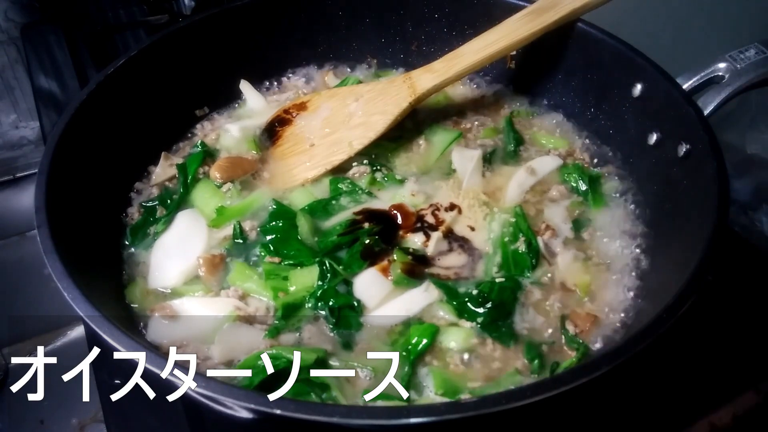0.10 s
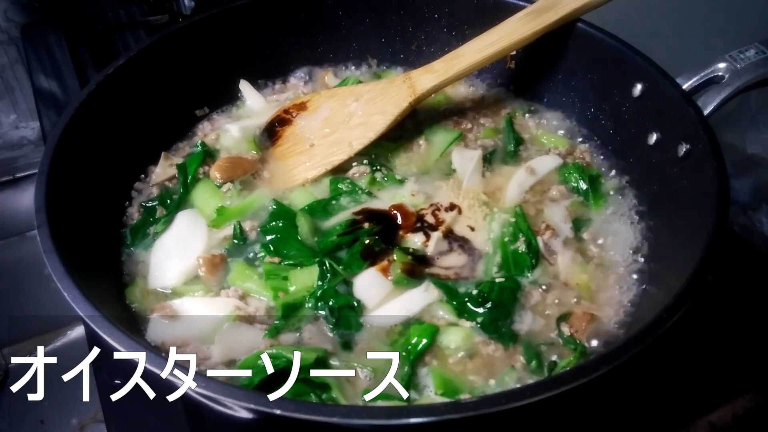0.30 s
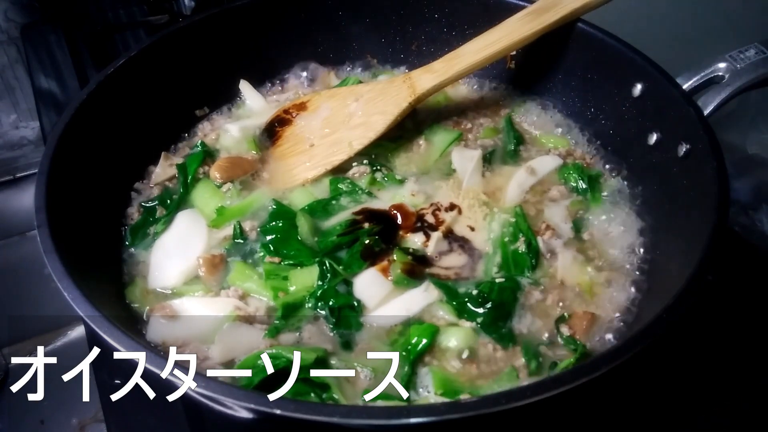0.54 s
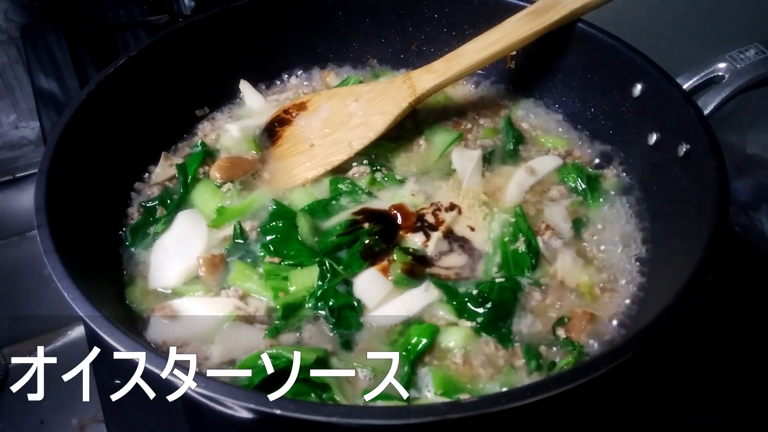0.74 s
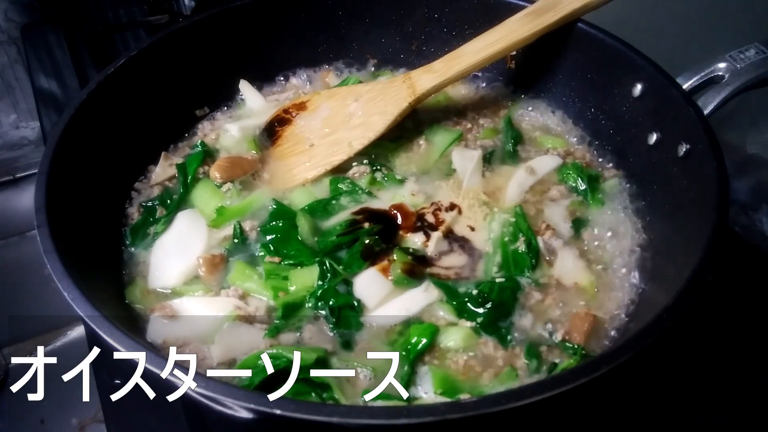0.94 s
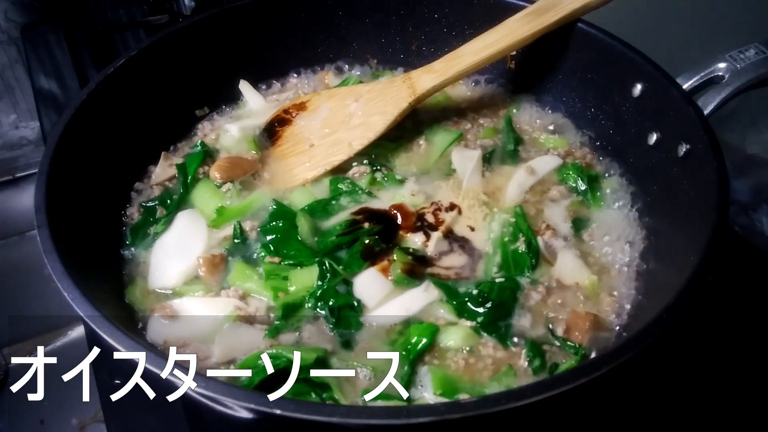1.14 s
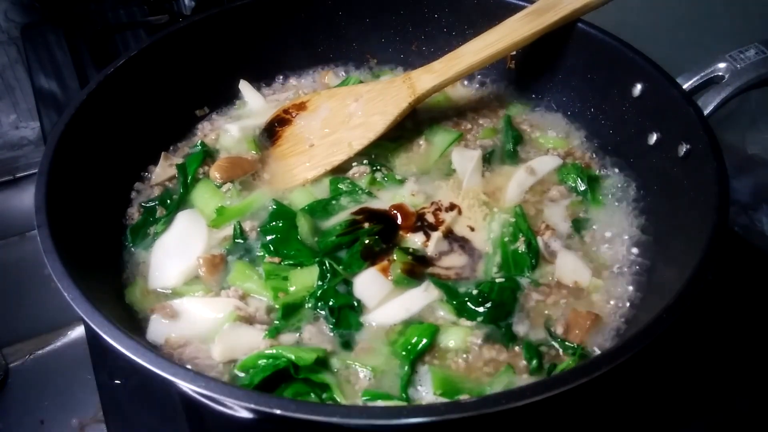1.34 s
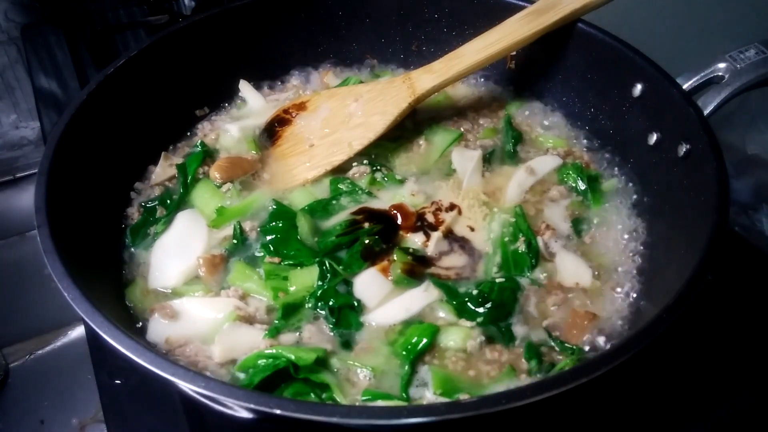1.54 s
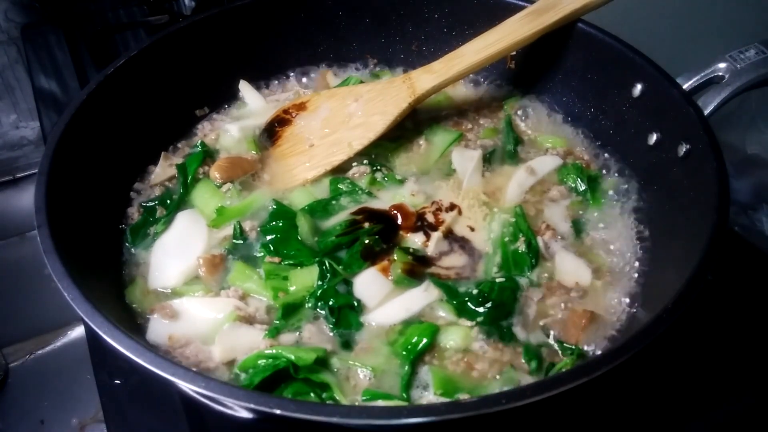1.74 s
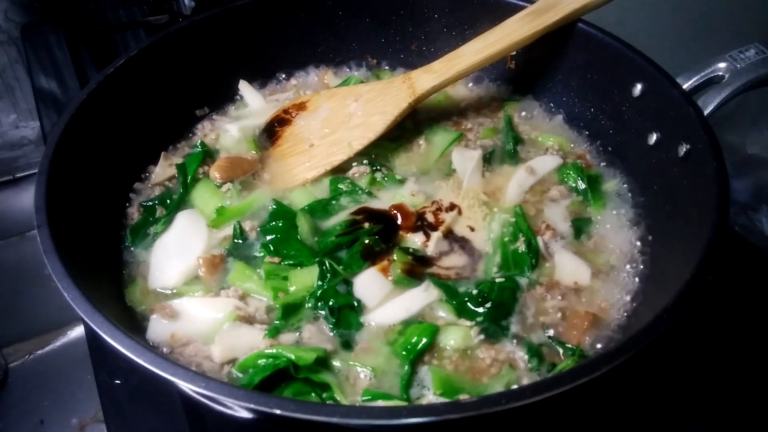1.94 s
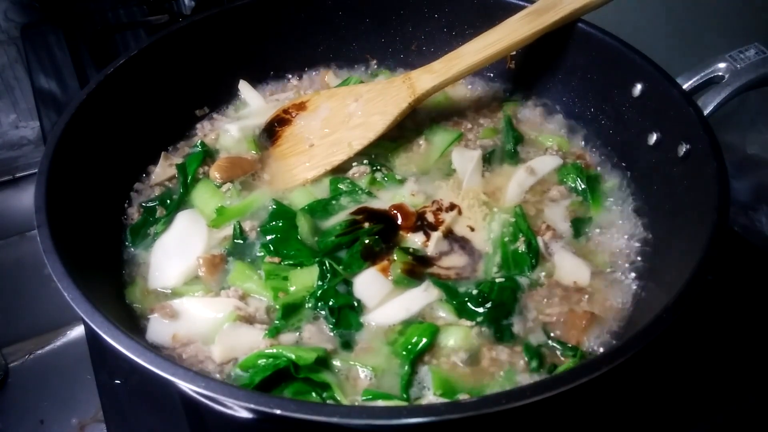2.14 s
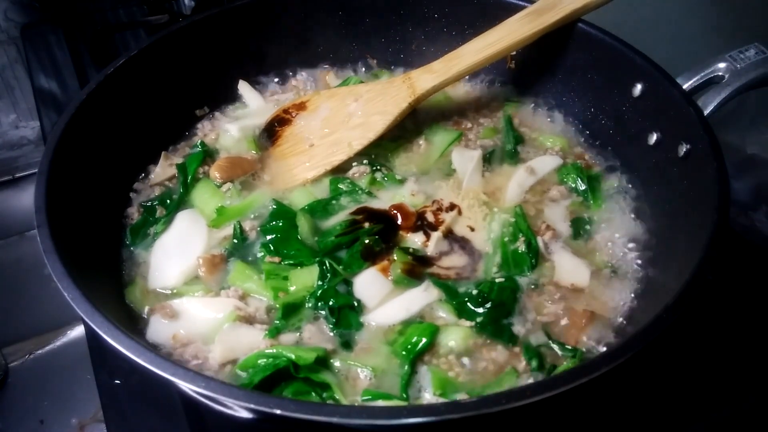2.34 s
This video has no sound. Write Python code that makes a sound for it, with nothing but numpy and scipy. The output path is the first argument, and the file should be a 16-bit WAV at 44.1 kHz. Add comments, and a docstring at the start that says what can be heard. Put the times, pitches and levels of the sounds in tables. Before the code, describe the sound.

A heavy bottle bumps and judders along a counter, thumps again a moment later, then its plastic cap creaks and snaps shut; broth simmers quietly throughout in a small kitchen, close microphone, loud blows flattened.

```python
"""Simmering broth and a bottle bumped on the counter

Broth simmers in a frying pan: noise and tiny damped sines fizz over small bubbles and a low stove hum.
Something heavy, probably a sauce bottle, bumps the counter, judders along it, thumps again and rocks:
decaying counter modes, noise bursts, gritty grains and a boom rising in pitch.
A plastic cap creaks and snaps shut in noise bursts and hollow pops; a limiter flattens the loud blows."""
import sys
import numpy as np
from scipy.fft import rfft, irfft, next_fast_len
from scipy.io import wavfile
from scipy.ndimage import uniform_filter1d, minimum_filter1d, map_coordinates

SR = 44100
rng = np.random.default_rng(int(sys.argv[2]) if len(sys.argv) > 2 else 0)


def to_wav(sig):
    """Store sig (one row per channel, or 1-D mono) as 16-bit WAV at the path in sys.argv[1].

    Samples outside -1..1 are clipped; the rate is SR.
    """
    pcm = np.clip(np.atleast_2d(sig), -1, 1) * 32767
    pcm = np.round(pcm).astype(np.int16)
    wavfile.write(sys.argv[1], SR, pcm.T)  # frames by channels


N = 110250  # samples, 2.5 s
TIME_S = np.arange(N) / SR
ROOM_T60_S = 0.28

# Modes of the counter. Each row: frequency in Hz, relative level in dB, t60 in s.
COUNTER_MODES = [(42.6, -3, 0.39), (64.4, 2, 0.097), (95.1, -5, 0.23), (148.5, -5, 0.38), (183.4, -7, 0.27),
                 (237.7, -10.5, 0.37), (296.8, -5.5, 0.22), (316.2, -8, 0.22), (337.4, -11, 0.33),
                 (359.4, -7, 0.17), (439.8, -14, 0.33), (482, -14.5, 0.29), (689, -14, 0.083),
                 (900, -18.5, 0.22), (1277, -34, 0.26)]
# Spectrum of the dense ring between the modes. Each row: frequency in Hz, relative density in dB per Hz.
THUD_SPECTRUM = [(25, -18), (50, 5), (150, 1), (340, -5), (520, -15), (1000, -21.5), (1450, -25.5),
                 (1650, -30), (1900, -26.5), (2300, -38), (5000, -55), (16000, -45)]


def amp(db):
    """Decibels to gain."""
    return 10 ** (np.asarray(db) / 20)


def unit(x):
    """Scale to rms 1."""
    return x / np.sqrt(np.mean(x ** 2) + 1e-20)


def curves(rows):
    """Interpolate each column after the time to one value per sample."""
    time_s, *columns = np.transpose(rows)
    return [np.interp(TIME_S, time_s, column) for column in columns]


def wobble(knots_per_s):
    """Smooth random curve of about unit spread; it repeats after 512 knots."""
    return map_coordinates(rng.standard_normal(512), [np.arange(N) * knots_per_s / SR], mode="wrap")


def filtered(x, response):
    """Multiply the spectrum of x by a response of frequency, zero-padded by at least 0.5 s."""
    size = next_fast_len(N + SR // 2)
    spectrum = rfft(x, size) * response(np.fft.rfftfreq(size, 1 / SR))
    return irfft(spectrum, size)[:N]


def colour(points):
    """Response through (Hz, dB) points on a log-frequency axis."""
    f, db = np.transpose(points)
    return lambda hz: amp(np.interp(np.log(hz + 1), np.log(f + 1), db))


def resonances(rows):
    """Causal sum of second-order resonances (Hz, width Hz, dB)."""
    return lambda f: sum(amp(db) * 1j * f * width / (centre * centre - f * f + 1j * f * width)
                         for centre, width, db in rows)


def hump(hz, centre_hz, octaves):
    """Broad band, gain halved at the given octaves from its centre."""
    return 1 / (1 + (np.log2((hz + 1) / centre_hz) / octaves) ** 2)


def noise(response):
    """Filtered white noise of rms 1."""
    return unit(filtered(rng.standard_normal(N), response))


def burst(start_s, rise_s, t60_s):
    """Envelope: straight rise, then exponential decay."""
    age_s = TIME_S - start_s
    decay = np.exp(-np.log(1000) * np.maximum(age_s - rise_s, 0) / t60_s)
    return np.clip(age_s / rise_s, 0, 1) * decay


def bubbles(per_s, hz, scatter, cycles, spread_db, glide, size):
    """Damped sines at random times, pitches and levels, rising in pitch if glide > 0; rms 1."""
    draws = rng.random((int(per_s * N / SR), 4))
    pitch_hz = hz * np.exp(scatter * (draws[:, 1:2] + draws[:, 2:3] - 1))
    turns = np.minimum(pitch_hz, SR / 3) * np.arange(size) / SR
    age = turns / cycles
    level = amp(-spread_db * np.log(np.maximum(draws[:, 3:], .01)))
    wave = level * np.exp(-np.pi * age) * np.sin(2 * np.pi * turns * (1 + glide * age))
    at = (draws[:, :1] * N).astype(int) + np.arange(size)
    return unit(np.bincount(at.ravel(), wave.ravel(), N + size)[:N])


def in_room(response, hits, room_db):
    """Noise bursts (s, dB, rise s, t60 s), each with the kitchen's short noise tail."""
    direct = sum(amp(db) * burst(s, rise_s, t60_s) for s, db, rise_s, t60_s in hits)
    tail = sum(amp(db + room_db) * burst(s, rise_s + 0.0016, ROOM_T60_S) for s, db, rise_s, _ in hits)
    return direct * noise(response) + tail * noise(response)


def thumps():
    """Each blow rings the counter's modes and a dense noise thud within the band of its push."""
    # Each row: start in seconds, level in dB, centre of the push in Hz, width in octaves, rise in seconds.
    blows = [(.222, -12, 347, 1.9, 0.0022), (0.242, -16, 101, 2, 0.0035), (0.296, -13, 50, 1.1, 0.0061),
             (0.3503, -13, 360, 1.43, 0.0028), (0.386, -22, 70, 4.4, 0.0012),
             (.522, -22.5, 310, .7, 0.0045), (0.608, -28, 99, 0.2, 0.018), (1.009, -17, 412, 1.74, 0.0016),
             (1.022, -14.5, 89, 0.39, 0.0056), (1.051, -24, 340, 2.4, 0.0046),
             (1.15, -32, 141, 0.87, 0.0074), (0.744, -33.5, 310, 0.16, 0.0097),
             (1.47, -37, 310, 0.6, 0.0087), (1.54, -26.5, 280, 0.23, 0.027),
             (2.308, -32.5, 360, 0.66, 0.00092), (2.335, -38.5, 290, 0.29, 0.0047)]
    thud_db, thud_t60_s = 2.5, 0.29
    mode_spread_db, phase_spread_rad = 2.8, 1.0
    out = np.zeros(N)
    for s, db, centre_hz, octaves, rise_s in blows:
        push = lambda hz: hump(hz, centre_hz, octaves)
        ring = np.zeros(N)
        for hz, mode_db, t60_s in COUNTER_MODES:
            level = amp(mode_db + rng.normal(0, mode_spread_db)) * push(hz)
            phase = 2 * np.pi * hz * (TIME_S - s) + rng.normal(0, phase_spread_rad)
            ring += level * burst(s, rise_s, t60_s) * np.sin(phase)
        thud = filtered(noise(colour(THUD_SPECTRUM)), push) * burst(s, rise_s, thud_t60_s)
        out += amp(db) * (ring + amp(thud_db) * thud)
    return out


def rocking():
    """The base rocks against the counter: a rough boom, rising in pitch, that then dies away."""
    # One row: start in seconds, length in seconds, first and last frequency in Hz, level in dB.
    start_s, length_s, first_hz, last_hz, db = (1.0185, .046, 66, 124, -15)
    rise_s, t60_s, rough_db = 0.0044, 0.023, 2
    age_s = TIME_S - start_s
    hz = first_hz + (last_hz - first_hz) * np.clip(age_s / length_s, 0, 1)
    decay = np.exp(-np.log(1000) * np.maximum(age_s - length_s, 0) / t60_s)
    envelope = np.clip(age_s / rise_s, 0, 1) * decay
    boom = np.sin(2 * np.pi * np.cumsum(hz * (age_s > 0)) / SR)
    return amp(db + rough_db * wobble(2 * last_hz)) * envelope * boom


def ticks():
    """Hard contacts: a tick of tilted noise plus a short resonant clack with its own pitch."""
    # Each row: start in seconds, level in dB, t60 in seconds, clack over tick in dB,
    # tick tilt in dB per octave, clack frequency in Hz.
    contacts = [(0.2196, -9.5, 0.014, -17.5, -1.5, 2740), (0.2215, -10, 0.013, -4.5, -2.5, 1970),
                (.251, -22, 0.043, 5, -5, 1070), (0.2782, -29.5, 0.016, -10, -1.5, 1920),
                (0.3481, -31.5, 0.023, 2.5, 5, 1830), (0.364, -29, 0.027, -6, -1.5, 3250),
                (0.403, -27.5, 0.014, -3.5, -4, 2575), (0.429, -36, .02, 4, 4, 1930),
                (1.0059, -19, 0.019, 1.5, 0, 953), (1.0114, -27, 0.047, -5, -3.5, 1930),
                (2.245, -31.5, 0.021, -13, -0.5, 2380)]
    # Tick spectrum before tilt. Each row: frequency in Hz, relative density in dB per Hz.
    tick_spectrum = [(300, -13), (1200, 12), (2600, -10.5), (6300, -2.5), (7700, 13.5), (9000, 2.5),
                     (10200, 16.5), (12300, -1), (16000, -2)]
    clack_width_hz = 120
    out = np.zeros(N)
    for s, db, t60_s, clack_db, tilt_db, clack_hz in contacts:
        # no tilt below SR / 128
        tilted = lambda hz: colour(tick_spectrum)(hz) * amp(tilt_db * np.log2(np.maximum(hz, SR / 128)))
        out += amp(db) * burst(s, 0.00093, t60_s) * noise(tilted)
        clack = noise(resonances([(clack_hz, clack_width_hz, 0)]))
        out += amp(db + clack_db) * burst(s, 0.0006, t60_s) * clack
    return out


def slide():
    """Uneven slips keep the counter's modes ringing; grit rasps under the moving weight."""
    # Each row: time in seconds, level of the shaking in dB, level of the grit in dB.
    judder = [(.225, -24, -38), (.25, -13.5, -27), (.29, -26, -31.5), (.315, -28, -34.5), (.346, -29, -37),
              (.358, -14.5, -32), (.388, -27, -46), (.408, -17.5, -41.5), (.47, -15.5, -38.5),
              (.545, -21, -52), (.575, -33.5, -56), (.63, -45, -48.5), (.8, -47.5, -56.5)]
    # Grit spectrum. Each row: frequency in Hz, relative density in dB per Hz.
    grit_spectrum = [(300, 2), (650, 10.5), (1200, 3), (3200, -7), (4500, -11), (6500, -6.5), (7600, -3.5),
                     (10500, -6), (12500, -15)]
    slip_knots_per_s, slip_db, slip_turn_rad = 28, 6, 1
    push_hz, push_octaves, thud_db = 302, 0.8, -5
    grains_per_s, grain_db = 420, -5.5
    shake_db, grit_db = curves(judder)
    moving = (TIME_S > judder[0][0]) & (TIME_S < judder[-1][0])
    ring = np.zeros(N)
    for hz, mode_db, _ in COUNTER_MODES:
        level = amp(mode_db + slip_db * wobble(slip_knots_per_s)) * hump(hz, push_hz, push_octaves)
        phase = 2 * np.pi * (hz * TIME_S + rng.random()) + slip_turn_rad * wobble(slip_knots_per_s)
        ring += level * np.sin(phase)
    shake = unit(ring) + amp(thud_db) * noise(colour(THUD_SPECTRUM))
    grains = bubbles(grains_per_s, hz=1570, scatter=0.98, cycles=12, spread_db=3.0, glide=0, size=600)
    rasp = amp(2 * wobble(161.2)) * noise(colour(grit_spectrum))
    grit = unit(amp(grain_db) * grains + rasp)
    return moving * (amp(shake_db) * shake + amp(grit_db) * grit)


def cap():
    """The plastic cap creaks in grainy noise, then snaps shut: noise cracks, sine pops, a hollow tail."""
    # Each row: start in seconds, level in dB, rise in seconds, t60 in seconds.
    creaks = [(1.661, -21.5, 0.009, 0.043), (1.71, -24, 0.0012, 0.024)]
    # Each row: start in seconds, level in dB.
    snaps = [(1.8014, -7.5), (1.8107, -22)]
    # Each row: start in seconds, level in dB, pitch in Hz.
    pops = [(1.7719, -23.5, 1000), (1.804, -21.5, 990), (1.8060, -10, 887)]
    # Spectra. Each row: frequency in Hz, relative density in dB per Hz.
    creak_spectrum = [(200, -18), (980, 4.5), (1500, -15), (2500, -3), (3600, -8.5), (5200, 1.5),
                      (6400, -5.5), (7600, 4), (10300, -1), (12300, -7), (14300, -9), (16000, 2)]
    snap_spectrum = [(200, -1.5), (950, 5.5), (1600, -6), (2100, 1), (4200, -2.5), (5600, 5), (10300, 4),
                     (12300, -8), (16000, -20)]
    # Hollow of the cap. Each row: frequency in Hz, width in Hz, relative level in dB.
    hollow_modes = [(646, 55, 2.5), (774, 50, -2), (922, 75, 1), (1220, 69, -3), (1454, 44, -4),
                    (1744, 30, -10)]
    creak_room_db, grain_db, grain_knots_per_s = -9.5, 1.5, 800
    snap_t60_s, snap_room_db = 0.013, -19.5
    pop_rise_s, pop_t60_s, pop_room_db = 0.0012, 0.007, -20.5
    creak = in_room(colour(creak_spectrum), creaks, creak_room_db)
    creak *= amp(grain_db * wobble(grain_knots_per_s))
    snap_hits = [(s, db, .0004, snap_t60_s) for s, db in snaps]
    crack = in_room(colour(snap_spectrum), snap_hits, snap_room_db)
    pop = sum(amp(db) * burst(s, pop_rise_s, pop_t60_s) * np.sin(2 * np.pi * hz * (TIME_S - s))
              for s, db, hz in pops)
    tail = sum(amp(db + pop_room_db) * burst(s, 0.0018, ROOM_T60_S) for s, db, _ in pops)
    return creak + crack + pop + tail * noise(resonances(hollow_modes))


def scuffs():
    """Soft rubs of handling: bursts of broad-band noise."""
    # Each row: start in seconds, level in dB, rise in seconds, t60 in seconds, centre in Hz.
    rubs = [(.73, -50.5, 0.02, 0.094, 2250), (1.356, -46.5, .015, 0.37, 3240),
            (1.366, -45, 0.0026, 0.29, 830), (1.467, -46.5, 0.011, 0.29, 1150),
            (2.214, -42, 0.012, 0.37, 2780), (2.309, -46.5, 0.0026, 0.64, 780)]
    width_octaves = 0.82
    return sum(amp(db) * burst(s, rise_s, t60_s) * noise(lambda hz: hump(hz, centre_hz, width_octaves))
               for s, db, rise_s, t60_s, centre_hz in rubs)


def simmer():
    """Tiny bursting bubbles fizz at the rim; larger ones plop in seething, pan-coloured noise."""
    # Fizz level. Each row: time in seconds, level in dB.
    fizz_level = [(0, -45.5), (.15, -43), (.55, -44.5), (.76, -43), (.92, -44), (1.3, -44), (1.4, -40),
                  (1.58, -44.5), (1.9, -41.5), (2.2, -45), (2.5, -44)]
    # Spectra. Each row: frequency in Hz, relative density in dB per Hz.
    fizz_spectrum = [(2500, -45), (4500, -17), (6200, -12), (6900, -5), (7500, 2), (8300, -3.5), (9200, -3),
                     (10500, 1), (11300, -2.5), (12000, -14.5), (13000, -10.5), (14200, -8), (15700, -10)]
    broth_spectrum = [(20, -6), (45, 0), (130, 0.5), (200, -4), (320, -5), (430, -11.5), (900, -9.5),
                      (1400, -20.5), (2000, -20.5), (3200, -21), (4500, -37.5), (8000, -73)]
    # Pan resonances kept ringing by the seething. Each row: frequency in Hz, width in Hz, relative level in dB.
    pan_modes = [(291, 36, 2), (356, 8.8, -3), (562, 9.6, 1.5), (657, 5.8, -5.5), (883, 150, -15.5),
                 (1662, 56, -9.5)]
    crackles_per_s, crackle_db, crackle_spread_db = 1800, -2.5, 3.5
    flutter_db, flutter_knots_per_s = 1.9, 37
    broth_db, pan_db = -48.5, -53.5
    plops_per_s, plop_db, plop_hz, plop_spread_db = 160, -60.5, 1323, 2.5
    level_db, = curves(fizz_level)
    crackle = bubbles(crackles_per_s, hz=8900, scatter=0.26, cycles=5.1,
                      spread_db=crackle_spread_db, glide=0, size=64)
    crackle = unit(filtered(crackle, colour(fizz_spectrum)))
    fizz = unit(noise(colour(fizz_spectrum)) + amp(crackle_db) * crackle)
    fizz *= amp(level_db + flutter_db * wobble(flutter_knots_per_s))
    plops = bubbles(plops_per_s, hz=plop_hz, scatter=1.11, cycles=12,
                    spread_db=plop_spread_db, glide=0.014, size=1500)
    broth = noise(colour(broth_spectrum)) * amp(broth_db + 0.89 * wobble(10.76))
    pan = amp(pan_db) * noise(resonances(pan_modes))
    return fizz + broth + pan + amp(plop_db) * plops


def blips():
    """A few larger bubbles, each a short decaying sine with unsteady phase."""
    # Each row: start in seconds, level in dB, pitch in Hz.
    single_bubbles = [(1.997, -48, 1660), (2.378, -43, 2210), (2.381, -47, 2560)]
    rise_s, t60_s, waver_knots_per_s = 0.002, 0.12, 90
    return sum(amp(db) * burst(s, rise_s, t60_s)
               * np.sin(2 * np.pi * hz * (TIME_S - s) + wobble(waver_knots_per_s))
               for s, db, hz in single_bubbles)


def stove():
    """Low hum: sine tones wavering in level and phase."""
    # Each row: time in seconds, level in dB.
    hum_level = [(0, -72), (.62, -43.5), (.85, -60), (1.25, -46.5), (1.85, -45.5), (2.05, -42), (2.5, -47)]
    # Each row: frequency in Hz, relative level in dB.
    hum_tones = [(63, 6.5), (101, 2), (195, -4.5), (486, -6.5)]
    waver_db, waver_rad = 3.5, 0.68
    level_db, = curves(hum_level)
    hum = sum(amp(db + waver_db * wobble(8.08))
              * np.sin(2 * np.pi * hz * TIME_S + waver_rad * wobble(6.61))
              for hz, db in hum_tones)
    return amp(level_db) * unit(hum)


def scene():
    """Sum of all sources in one channel."""
    bottle = thumps() + rocking() + ticks() + slide()
    handling = cap() + scuffs()
    kitchen = simmer() + blips() + stove()
    return (bottle + handling + kitchen)[None]


def record(dry):
    """A fast look-ahead limiter holds peaks under its ceiling; then the deepest bass and the top are cut."""
    ceiling, hold_s = 0.3, 0.0019  # ceiling as a fraction of full scale
    low_cut_hz, top_hz = 28, 15850
    span = max(int(hold_s * SR), 2)
    needed = np.minimum(1, ceiling / (np.abs(dry[0]) + 1e-9))
    gain = uniform_filter1d(minimum_filter1d(needed, span), span)
    band = lambda hz: (hz < top_hz) * hz ** 4 / (hz ** 4 + low_cut_hz ** 4)
    return filtered(dry[0] * gain, band)[None]


dry = scene()
out = record(dry)
to_wav(out)
```